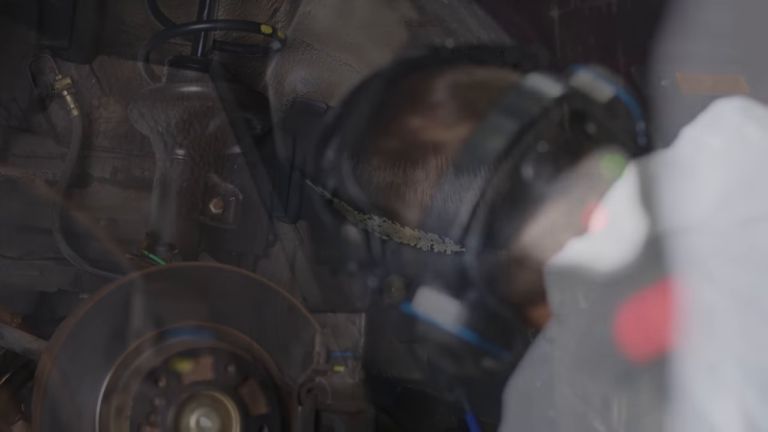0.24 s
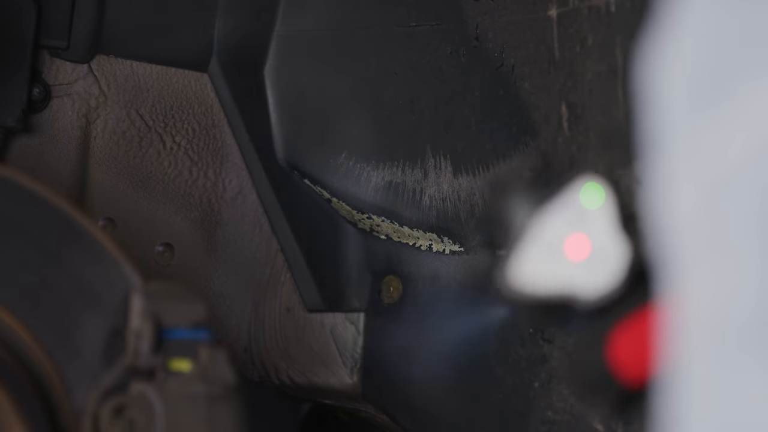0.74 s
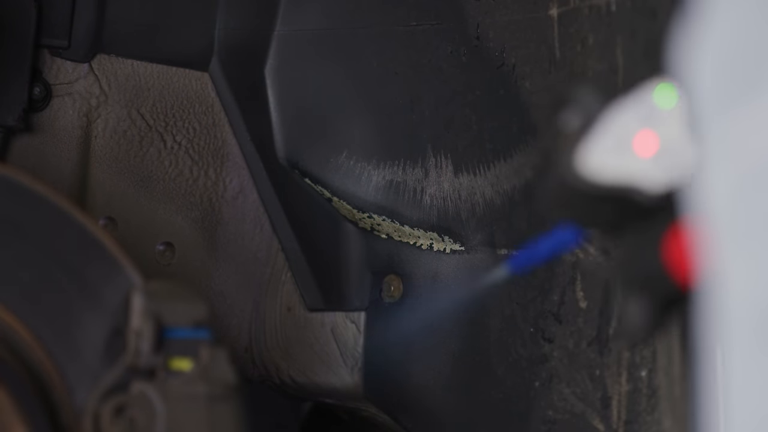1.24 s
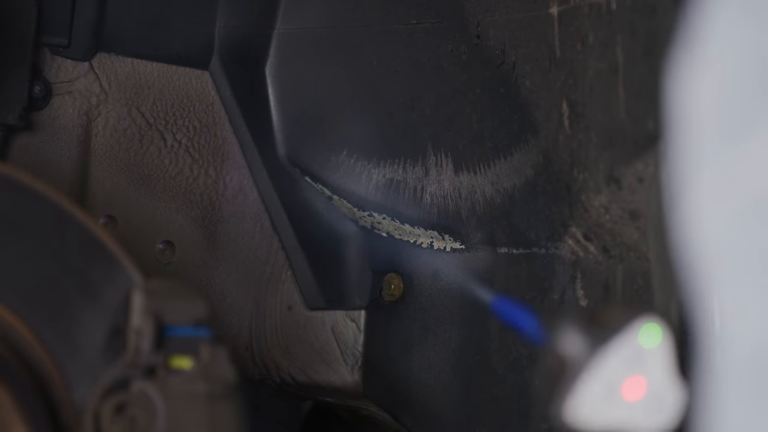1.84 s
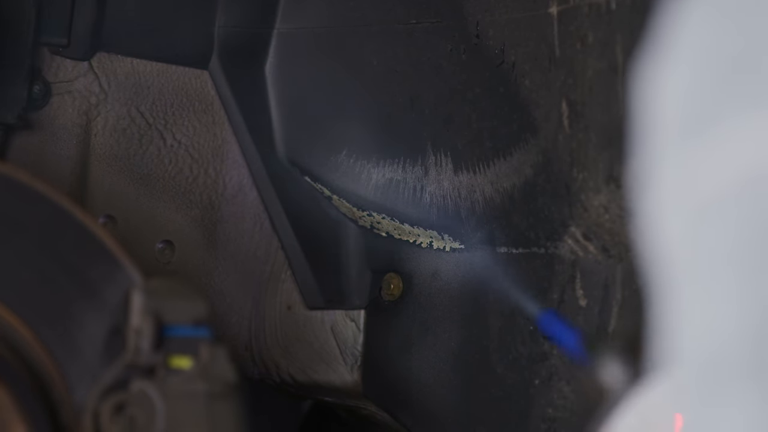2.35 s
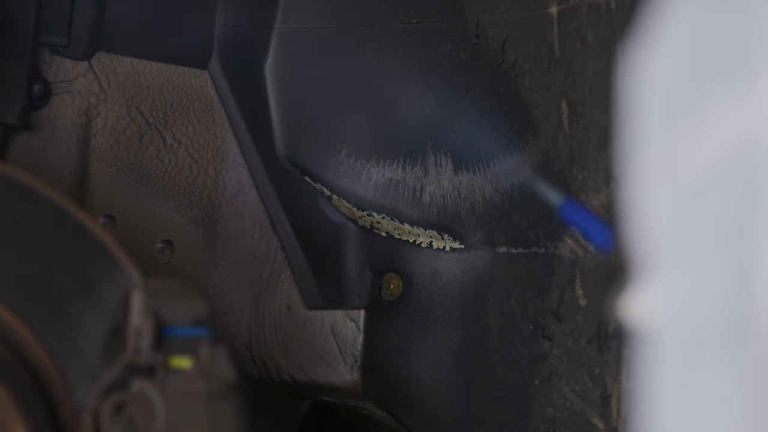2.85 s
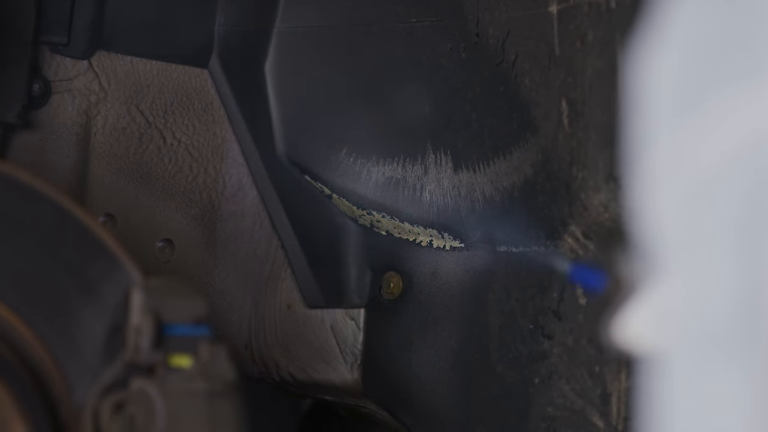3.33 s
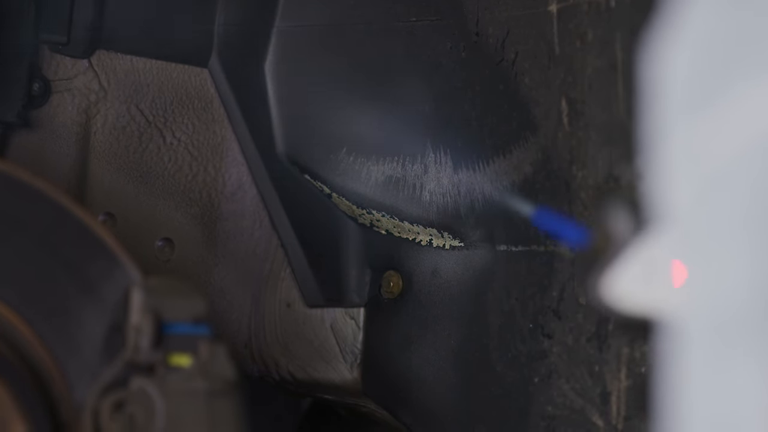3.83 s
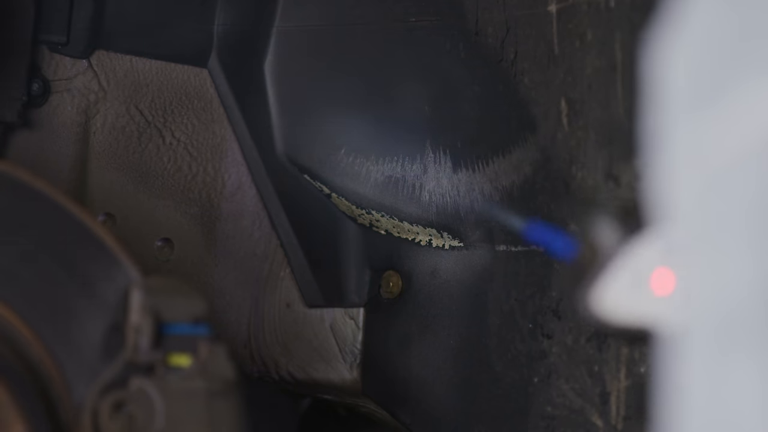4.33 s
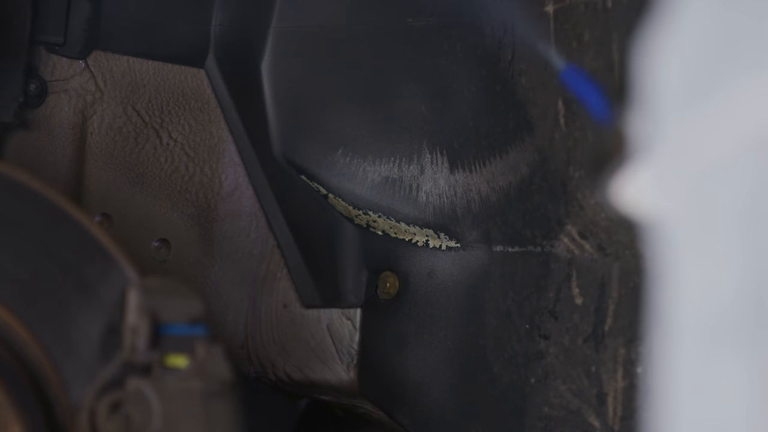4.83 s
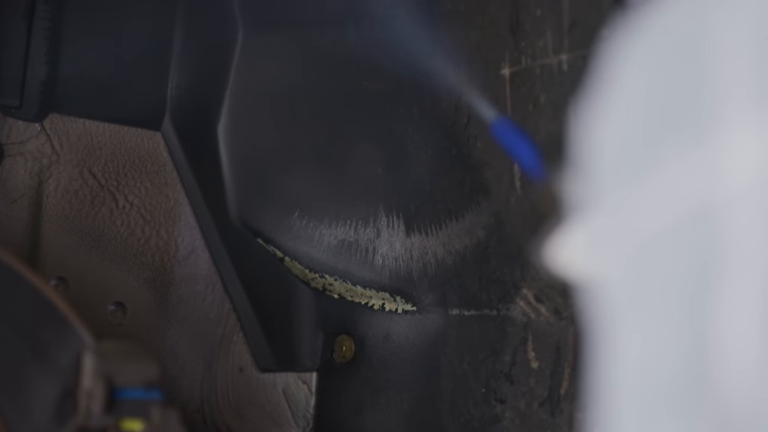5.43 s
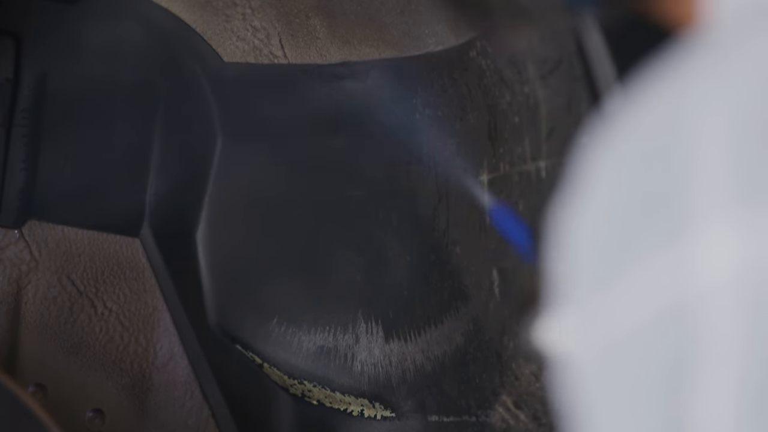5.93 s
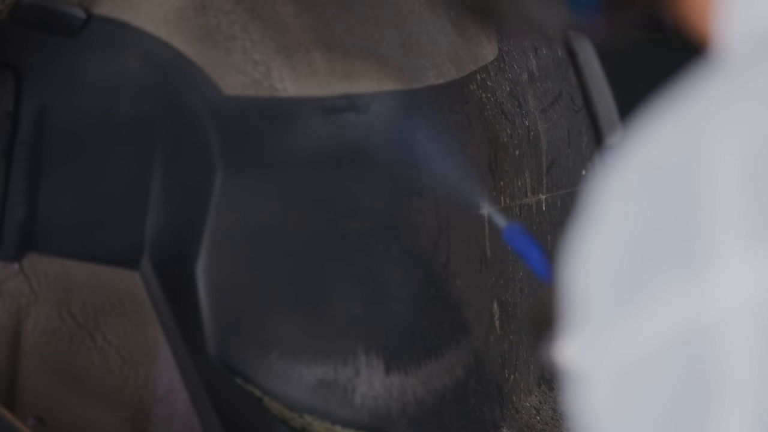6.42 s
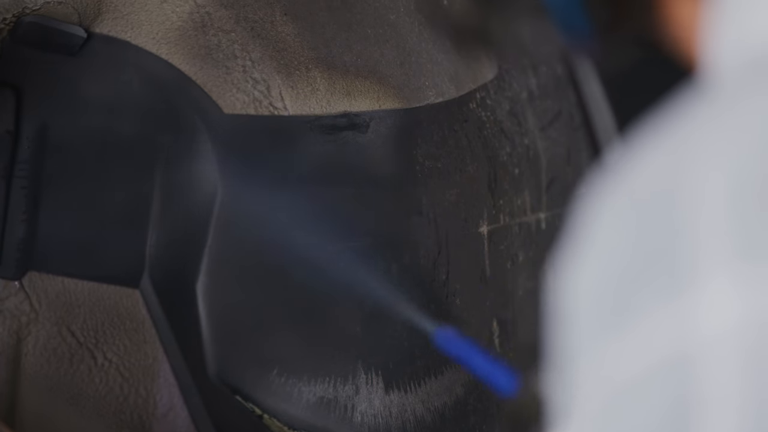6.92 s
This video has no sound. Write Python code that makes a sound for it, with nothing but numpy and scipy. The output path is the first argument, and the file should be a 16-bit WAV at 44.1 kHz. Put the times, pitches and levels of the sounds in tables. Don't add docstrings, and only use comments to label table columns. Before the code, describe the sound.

Unbroken pressurised air hiss, sharp and sizzling, already running at the start and still running at the end. Small quick swells and comb-like shifts follow the wrist movements across a car's wheel liner. A hollow midrange rush surges irregularly underneath, strongest around the first second or two. A distant compressor hum is nearly masked. One close microphone, dry, nearly centred sound with tight panel reflections and little low bass.

```python
import sys
import numpy as np
from scipy import signal
from scipy.fft import rfft, irfft, next_fast_len
from scipy.io import wavfile

SR = 44100
rng = np.random.default_rng(int(sys.argv[2]) if len(sys.argv) > 2 else 0)


def gain_from_decibels(decibels):
    exponent = np.asarray(decibels, float) / 20
    return 10 ** exponent


def master_out(mix):
    frames = np.transpose(np.atleast_2d(mix))
    ceiling = np.clip(frames, -1, 1)
    pcm = np.round(ceiling * 32767).astype(np.int16)
    wavfile.write(sys.argv[1], SR, pcm)


N = 316197
CUTOFF_HZ = 15720

# frequency in Hz, level in dB rms, unsteadiness in dB.
COMPRESSOR_TONES = [
    (55.8, -68.5, 5.5),
    (133.5, -61, 2),
    (305.6, -61.5, 4),
    (615, -63.5, 4.5),
]
# frequency in Hz, level in dB per Hz.
ARCH_SPECTRUM = [(15, -50), (25, -22), (48, -18), (92, -14), (138, -4.5), (258, -5.5), (456, 0), (727, -6),
                 (1010, -3), (1310, -8.5), (1600, -8.5), (2720, -14), (3200, -10.5), (4160, -42),
                 (7040, -120)]
# level in dB, then shares of depth, spill and turn (dB per dB).
ARCH_RANGES = [
    (-48, .1, 0.88, 0.072),
    (-43.5, 0.81, 0.32, -.3),
    (-40.5, 1.02, -0.13, 0.18),
    (-42.5, 0.15, 0.27, 0.33),
]
# time in seconds, lift in dB, place (0 rumble, 1 roar, 2 cavity, 3 upper cavity).
GUSTS = [(.16, 3.1, .1), (.56, 3.5, 1.4), (.9, 7.6, 0.74), (1.1, 4.1, .4), (1.2, 4, 1), (1.4, 5.3, .9),
         (1.59, 3.6, 1.2), (1.91, 6.8, 2.04), (2.2, 2.2, .1), (2.62, 3.1, 1.5), (2.83, 3.2, 2.1),
         (2.92, 2.7, .2), (3.09, 4.9, 1.4), (3.21, 3.1, .1), (3.67, 2.5, 0.74), (3.82, 4.1, 1.3),
         (3.97, 4, .1), (4.19, 5.3, 1.9), (4.31, 3.6, .2), (4.56, 5, 1.8), (4.9, 4.9, 1.55), (4.98, 2.8, 2),
         (4.72, 3.2, 1.1), (5.51, 3.3, 1), (5.99, 3.4, 2.1), (6.24, 5.1, 1), (6.52, 4.1, 0.99),
         (6.8, 3.8, 0.53), (6.94, 2.6, 2.2), (7.17, 4.4, 1.3)]
# frequency in Hz, level in dB per Hz.
JET_SPECTRUM = [(2700, -24.5), (3290, -16.5), (4050, -11.5), (4830, -9.5), (5510, -6.5), (8500, -8.5),
                (9800, -4.5), (11100, 0), (12800, -2)]
# frequency in Hz, level in dB per Hz.
JET_TOP_SPECTRUM = [(13800, -6.5), (14350, -9.5), (14800, -5.5), (15300, -4), (15720, -4.5)]
# level in dB, then shares of nearness, turn and tip (dB per dB).
GUN_RANGES = [
    (-33, 0.38, 0.94, .05),
    (-31.5, 1.3, -0.11, -.3),
    (-23.5, 1.1, -0.21, 0.11),
    (-31.5, .8, 0.71, 1.05),
]
# time in seconds, then nearness, turn to the microphone, depth in the hollow
# and air spilling out, all in dB.
POSE = [(0, 0, 0.5, 3.5, -3.5), (.22, -2, 0, -1, -2), (.5, -2.5, -0.5, -6, -.6), (.74, 0.4, -0.4, -3, -5),
        (.95, -0.5, -0.1, -2.5, 1), (1.4, 0, 1.7, -1.5, 1.5), (1.6, 0.1, 1.5, -2.5, -2),
        (2.2, -1, -0.2, -2.5, -0.5), (2.6, -0.6, 0.4, -2, -3.5), (3.1, -.6, 1, -2.5, 0),
        (4.3, -0.4, 0.1, -2.5, -1), (4.5, 0.3, -2, -1.3, -1), (5.2, .2, -2, -0.9, -2.5),
        (5.36, -0.5, -1.5, -.3, -3.5), (5.9, -0.5, -3, 0, -1), (6.3, .1, -2.5, 2, 1),
        (6.7, 0, -2.1, 0, -2.5), (7.17, -.4, -3, -2.5, -4)]
# time in seconds, then swell, turn to the microphone and tip showing, all in dB.
FLICKS = [(0.33, 1, 0.7, -3), (0.43, 1, -0.3, 0), (0.6, 1.3, 0.5, -1), (0.75, 0.5, 1.5, -4),
          (0.94, 1, 1.91, 0.82), (1.2, 0.1, 0.5, 1), (1.61, 1.07, 0.3, -2), (1.88, 1.69, 2, -2),
          (2.19, 1.27, 3, -0.56), (2.41, 1, 0.8, 2), (2.67, 0.71, 2.5, -1.63), (2.93, 0.96, 1, 2),
          (3.13, 0.5, 1, 3.18), (3.32, 1.2, -2, 1), (3.52, 0.5, 1.55, 1.24), (3.74, 1, 0.3, 1),
          (3.9, 0.4, 1.5, 0.85), (4.12, 1, -1, -0.24), (4.32, 0.5, 2.08, 1.93), (4.58, 1, 1.01, -2),
          (4.7, -0.23, -0.17, 1), (4.93, 0.7, 1.01, -0.96), (5.2, 0.8, 1.5, -1), (5.5, 0.6, 0.2, 1),
          (5.77, 1.5, 1.52, 1), (6.02, 0.3, 1.2, 0), (6.28, 0.84, 0.82, 0.57), (6.55, 1.3, 2.02, 0.3),
          (6.87, 1.4, 1.5, -1.03), (7.17, 1.3, 3, -3)]
# time in seconds, strength 0-1.
MAIN_PANEL = [
    (0, 0.05),
    (.55, 0.22),
    (.75, 0.04),
    (1.5, 0.06),
    (2.5, 0.16),
    (3.5, 0.14),
    (4.4, 0.13),
    (5.0, 0.18),
    (5.6, 0.05),
    (7.17, 0.14),
]
# delay in ms, steady strength, changing strength.
SMALL_PARTS = [(.2, 0.0056, 0.075), (.36, -0.035, 0.053), (.52, 0.034, 0.03), (.7, -0.0049, 0.071),
               (.9, 0.02, 0.063), (1.25, -0.0035, 0.11), (1.52, -0.03, 0.037), (2.1, -0.055, 0.058),
               (2.45, 0.059, 0.057), (2.9, 0.038, 0.064), (3.5, -0.0068, 0.046), (4.2, 0.0077, 0.049),
               (5.0, 0.024, 0.041), (6.2, 0.031, 0.055), (8.1, -0.028, 0.055)]
# start in seconds, end in seconds, frequency in Hz, width in Hz, lift in dB.
SEAMS = [(.78, 1.27, 1540, 80, 7.5), (.6, 1.16, 9700, 350, 4), (.65, 1.3, 14000, 400, 6),
         (1.5, 2, 10550, 300, 4.5), (1.98, 2.28, 10150, 300, 6), (1.34, 2.6, 5650, 520, 2),
         (2.2, 4.3, 8500, 210, 4), (2.2, 3.3, 14400, 700, 1), (3.4, 4.45, 14000, 700, 2),
         (3.2, 3.5, 11000, 410, 4.5), (3.6, 4.0, 11200, 250, 4), (2.3, 4.4, 4530, 150, 2.5),
         (4.45, 4.8, 7200, 280, 4), (5.6, 5.9, 7000, 300, 3.5), (4.9, 5.95, 11250, 290, 2),
         (4.8, 8.8, 5700, 150, 4), (6.4, 7.0, 6200, 330, 4), (6.7, 7.1, 8100, 170, -2),
         (4.9, 7.6, 480, 100, 1.5), (2.6, 6.9, 1070, 100, 3), (1.9, 7.1, 1290, 76, -3),
         (2.4, 4.7, 1850, 55, -5), (2.2, 4.5, 2290, 46, -2)]
# time in seconds, centre in Hz.
SIDE_PATCHES = [(.0329, 8960), (.3348, 14000), (.5205, 14500), (.7295, 4650), (1.31, 15600),
                (1.3797, 10300), (1.6815, 4700), (1.6815, 9000), (2.889, 4700), (2.889, 7900),
                (3.2373, 9000), (3.2373, 12000), (3.2373, 14800), (3.2605, 5200), (3.2605, 7000),
                (3.7481, 5200), (3.7481, 10300), (4.259, 10700), (4.259, 14900), (4.4215, 5700),
                (4.4215, 9700), (4.7698, 9700), (4.7698, 14900), (5.3503, 12400), (5.5825, 7000),
                (5.5825, 14400), (6.3952, 9000), (6.3952, 14300), (6.8132, 10400)]


def rms_one(x):
    return x / np.sqrt(np.mean(x ** 2) + 1e-20)


def in_time(rows):
    s, *columns = np.transpose(rows)
    return [np.interp(np.arange(N) / SR, s, c) for c in columns]


def drift(rate_hz):
    r = np.exp(-2 * np.pi * rate_hz * 40 / SR)
    noise = rng.standard_normal(N // 40 + 2002)
    slow = signal.lfilter([1], [1, -2 * r, r * r], noise)[2000:]
    return np.interp(np.arange(N) / 40, np.arange(len(slow)), rms_one(slow - slow.mean()))


def bumps(times_s, heights, rise_s, fall_s):
    t = np.arange(0, N + 64, 64) / SR - np.asarray(times_s)[:, None]
    bells = np.exp(-.5 * (t / np.where(t < 0, rise_s, fall_s)) ** 2)
    return np.interp(np.arange(N) / 64, np.arange(t.shape[1]), np.asarray(heights) @ bells)


def shaped(x, spectrum, edges_hz):
    size = next_fast_len(N)
    octave = np.log2(np.fft.rfftfreq(size, 1 / SR) + 1)
    hz, db = np.transpose(spectrum)
    colour = gain_from_decibels(np.interp(octave, np.log2(hz), db)) * (octave < np.log2(CUTOFF_HZ))
    coloured = rfft(x, size) * colour
    above = [np.clip(.5 + (octave - np.log2(edge)) / .06, 0, 1) for edge in edges_hz]
    return [rms_one(irfft(coloured * (a - b), size)[:N]) for a, b in zip(above, above[1:])]


def late(x, delay_ms):
    return np.roll(x, round(delay_ms * SR / 1000))


def compressor():
    t = np.arange(N) / SR
    hum = np.zeros(N)
    for hz, db, sway_db in COMPRESSOR_TONES:
        level = np.sqrt(2) * gain_from_decibels(db + sway_db * drift(1.5))
        hum += level * np.sin(2 * np.pi * hz * t + 0.83 * drift(1.45))
    return hum


def side_patches(size=2048, half_width=.09, level_db=-60.5):
    side = np.zeros(N + 2 * size)
    hz = np.fft.rfftfreq(size, 1 / SR)
    window = signal.windows.kaiser_bessel_derived(size, 4 * np.pi)
    for s, centre_hz in SIDE_PATCHES:
        band = (abs(hz / centre_hz - 1) < half_width) * (hz < CUTOFF_HZ)
        jet_db = np.interp(centre_hz, *np.transpose(JET_SPECTRUM + JET_TOP_SPECTRUM))
        gain = gain_from_decibels(level_db + jet_db) * np.sqrt(band.sum() * SR / size)
        noise = rms_one(irfft(rfft(rng.standard_normal(size)) * band))
        start = round(s * SR) + size // 2
        side[start:start + size] += gain * noise * window
    return side[size:size + N]


def panels(x, thin_hz=300, dull_hz=7000, panel_ms=1.94, swing_hz=2.83):
    thin = signal.sosfilt(signal.butter(1, thin_hz, "high", fs=SR, output="sos"), x)
    dull = signal.sosfilt(signal.butter(2, dull_hz, fs=SR, output="sos"), thin)
    out = x + in_time(MAIN_PANEL)[0] * late(dull, panel_ms)
    for delay_ms, steady, changing in SMALL_PARTS:
        strength = steady + 1.1 * changing * drift(swing_hz)
        out = out + strength * late(thin, delay_ms)
    return out


def held(rise_s=0.039, fall_s=0.043):
    near_db, turn_db, deep_db, spill_db = in_time(POSE)
    s, *heights = np.transpose(FLICKS)
    swell_db, twist_db, tip_db = [bumps(s, db, rise_s, fall_s) for db in heights]
    return near_db + swell_db, turn_db + twist_db, tip_db, deep_db, spill_db


def arch(rise_s=0.033, fall_s=0.045, gust_reach=0.89):
    _, turn_db, _, deep_db, spill_db = held()
    s, lift_db, where = np.transpose(GUSTS)
    levels_db = []
    for k, (db, deep, spill, turn) in enumerate(ARCH_RANGES):
        lift_here_db = lift_db * np.exp(-((where - k) / gust_reach) ** 2)
        pose_db = deep * deep_db + spill * spill_db + turn * turn_db
        levels_db.append(db + pose_db + bumps(s, lift_here_db, rise_s, fall_s))
    rumble_db, roar_db, cavity_db, upper_db = levels_db
    air = panels(rng.standard_normal(N))
    rumble, roar, cavity, upper = shaped(air, ARCH_SPECTRUM, [20, 270, 700, 1300, 3000])
    gust_db = 0.49 * drift(12)
    return (gain_from_decibels(rumble_db + 0.66 * drift(6)) * rumble
            + gain_from_decibels(roar_db + gust_db) * roar
            + gain_from_decibels(cavity_db + gust_db + 0.54 * drift(24)) * cavity
            + gain_from_decibels(upper_db + gust_db + .5 * drift(22)) * upper)


def turbulence(pellets_per_s, size_db, share):
    sizes = gain_from_decibels(size_db * np.minimum(rng.exponential(1, N), 4)) * rng.choice([-1, 1], N)
    hail = sizes * (rng.random(N) < pellets_per_s / SR)
    return np.sqrt(share) * rms_one(hail) + np.sqrt(1 - share) * rng.standard_normal(N)


def eddies(x, flicker_db, count=20, rate_hz=22):
    size = next_fast_len(N)
    place = np.fft.rfftfreq(size, 1 / SR) / CUTOFF_HZ * count
    whole = rfft(x, size)
    out = np.zeros(N)
    for k in range(count + 2):
        narrow = irfft(whole * np.clip(1 - abs(place - k), 0, 1), size)[:N]
        out += gain_from_decibels(flicker_db * drift(rate_hz)) * narrow
    return out


def gun():
    near_db, turn_db, tip_db, _, _ = held()
    hail = panels(turbulence(12000, size_db=3, share=0.084))
    bands = shaped(hail, JET_SPECTRUM + JET_TOP_SPECTRUM, [3000, 6300, 9300, 14300, 17000])
    blast = np.zeros(N)
    for band, (db, near, turn, tip) in zip(bands, GUN_RANGES):
        blast += band * gain_from_decibels(db + near * near_db + turn * turn_db + tip * tip_db)
    feed = gain_from_decibels(0.29 * drift(50))
    return eddies(blast * feed, flicker_db=1.38)


def seams(x, fade_s=.07):
    out = x.copy()
    for start_s, end_s, hz, width_hz, lift_db in SEAMS:
        a, b = round(start_s * SR), min(round(end_s * SR), N)
        t = np.arange(b - a) / SR
        r = np.exp(-np.pi * width_hz / SR)
        zeros = np.array([1, 0, -1]) * (1 - r * r) / 2
        poles = [1, -2 * r * np.cos(2 * np.pi * hz / SR), r * r]
        rung = signal.lfilter(zeros, poles, x[a:b])
        fade = np.clip(np.minimum(t, t[-1] - t) / fade_s, 0, 1)
        out[a:b] += (gain_from_decibels(lift_db) - 1) * fade * rung
    return out


def scene():
    mono = compressor() + seams(arch() + gun())
    return np.array([mono, mono])


def roll_off(x):
    return signal.sosfilt(signal.butter(12, 15920, fs=SR, output="sos"), x)


def record(dry):
    size = next_fast_len(N)
    passed = np.fft.rfftfreq(size, 1 / SR) < CUTOFF_HZ
    cut = irfft(rfft(dry, size) * passed, size)[:, :N]
    mix = cut + side_patches() * [[1], [-1]]
    return roll_off(mix)


dry = scene()
out = record(dry)
master_out(out)
```